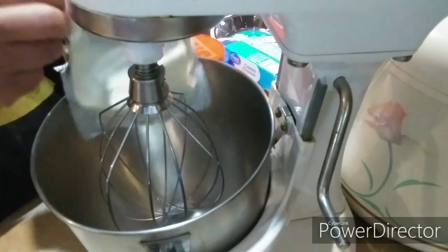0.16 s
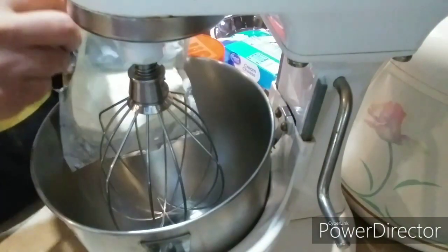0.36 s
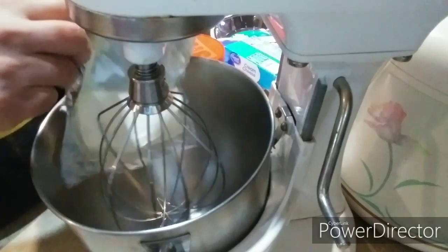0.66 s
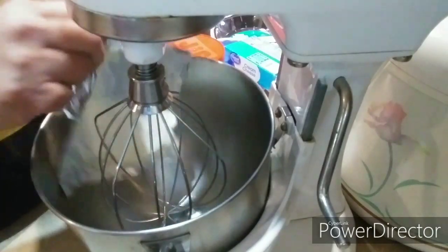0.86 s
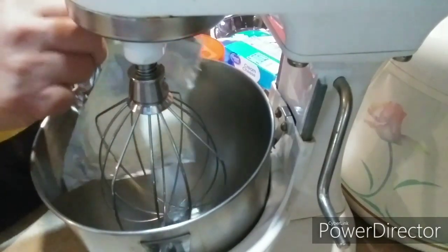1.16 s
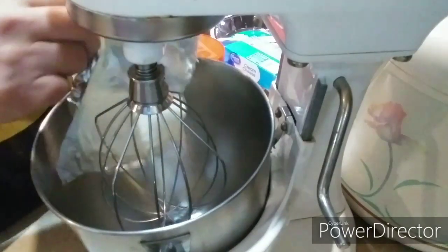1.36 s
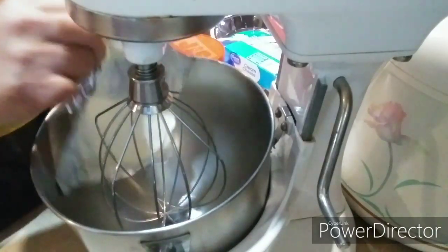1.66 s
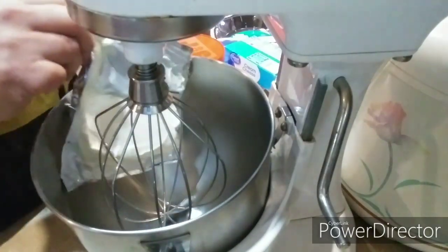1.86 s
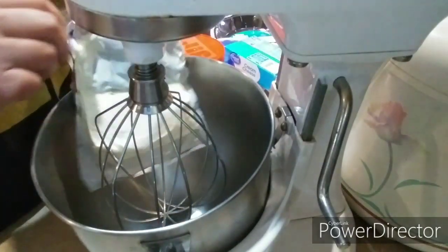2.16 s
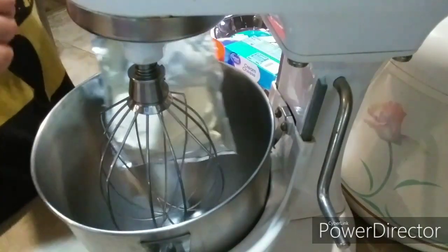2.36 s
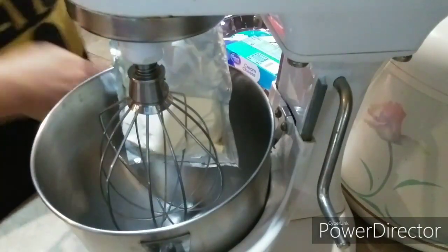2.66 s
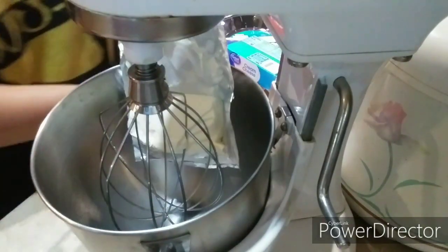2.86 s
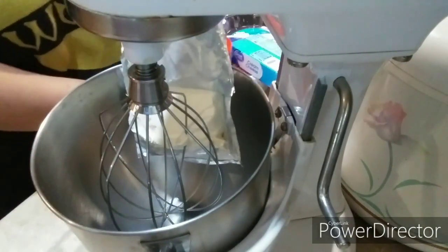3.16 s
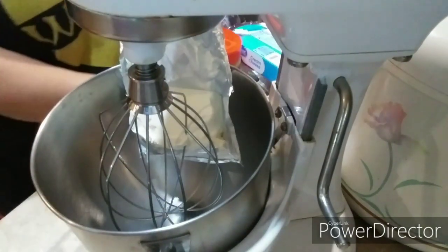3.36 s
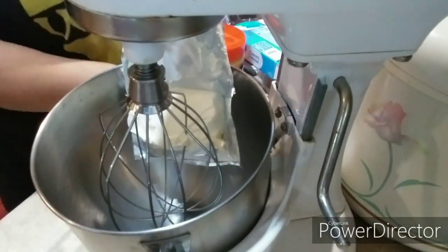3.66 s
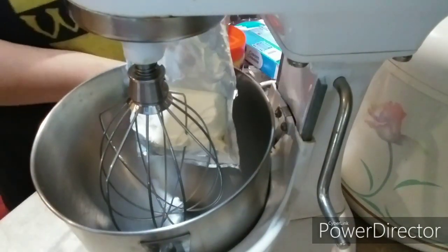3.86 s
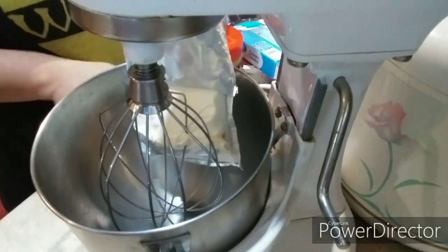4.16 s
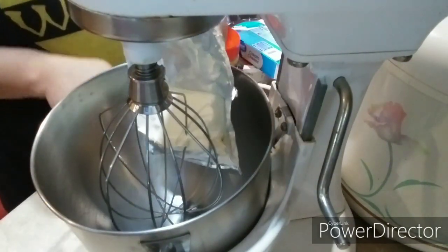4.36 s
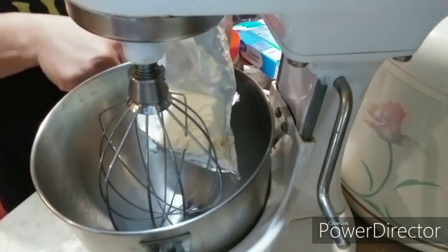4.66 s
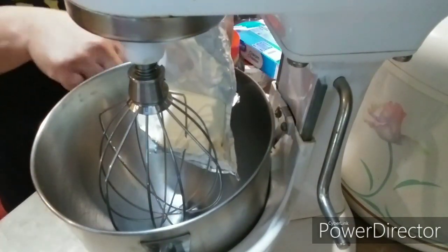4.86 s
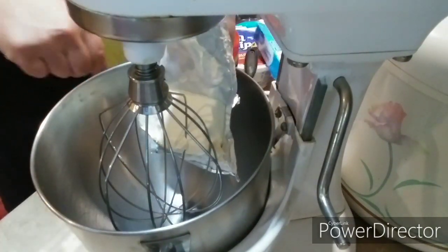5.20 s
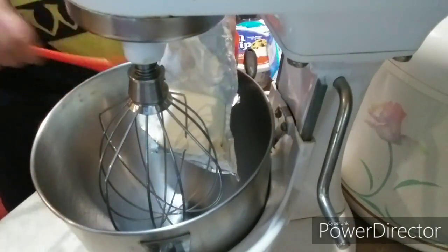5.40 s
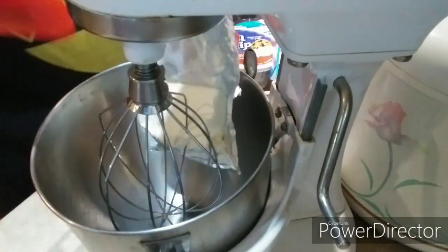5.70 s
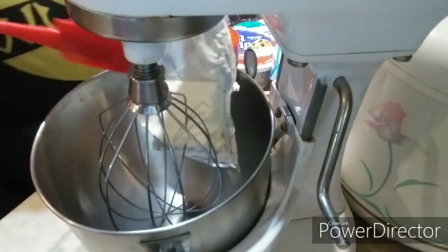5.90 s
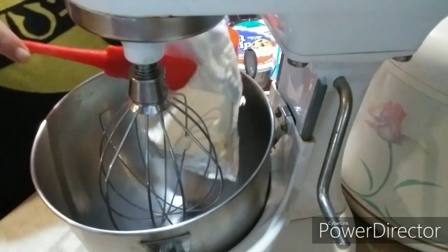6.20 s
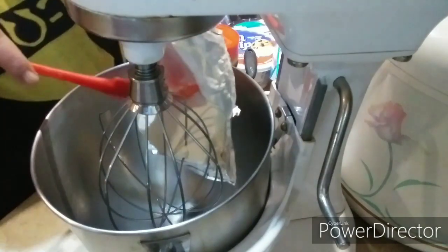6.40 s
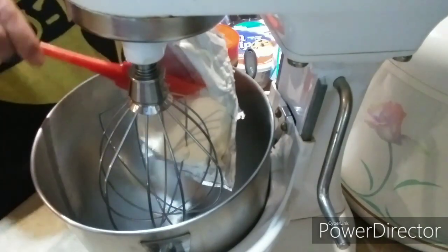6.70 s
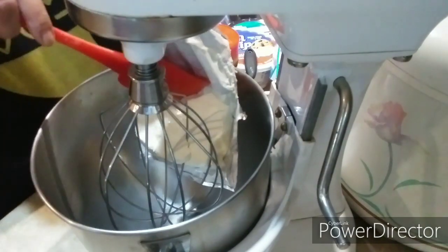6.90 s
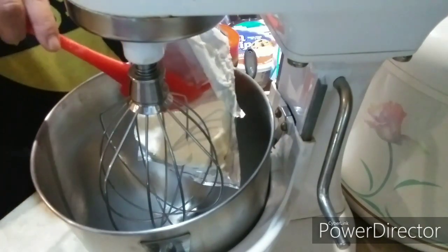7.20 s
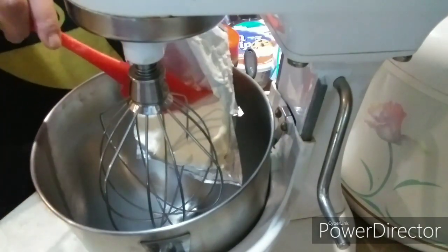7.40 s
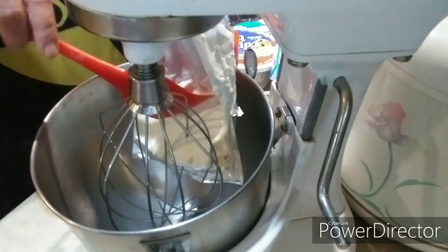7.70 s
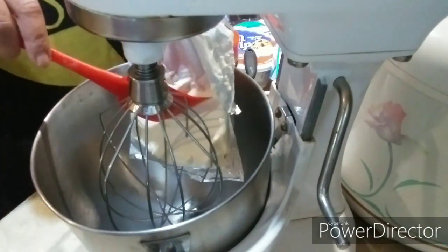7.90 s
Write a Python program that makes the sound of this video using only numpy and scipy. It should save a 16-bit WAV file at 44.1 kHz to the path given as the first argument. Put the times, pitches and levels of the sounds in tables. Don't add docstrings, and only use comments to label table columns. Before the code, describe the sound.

A quiet small kitchen with faint hiss and barely any hum, picked up very close by a phone-like microphone with bright, crisp treble. From 0 to 2.5 s hands crinkle a stiff foil packet in short irregular bursts: dense fine rustle, sharp snaps at about 0.4, 0.9 and 2.2 s, creases running along the sheet, light finger taps, and a faint airy drag near 1.0-1.4 s. A lull follows, then crisp snaps at 3.1 and 3.2 s and a brief rustle. From 3.4 to 5.0 s come sparse small taps and dull low thumps on the counter. At 5.12 s a utensil lands loudly and bounces, landing again at 5.33 s with several quick rebounds; worktop clatter and wavering steel ring fade by about 6 s. From 5.7 to 7.9 s a spatula gives light taps and foil ticks, strongest around 6.0-6.6 s, thinning to near silence.

```python
import sys
import numpy as np
from scipy import signal
from scipy.fft import rfft, irfft
from scipy.io import wavfile
from scipy.ndimage import uniform_filter1d

SR = 44100
rng = np.random.default_rng(int(sys.argv[2]) if len(sys.argv) > 2 else 0)


def rack_gain(trim_db):
    fader = np.asarray(trim_db, float)
    return 10 ** (fader / 20)


def transcribe(signal):
    frames = np.atleast_2d(signal).T
    limited = np.clip(frames, -1, 1)
    pcm = np.round(limited * 32767).astype(np.int16)
    wavfile.write(sys.argv[1], SR, pcm)


N = 355005

# f/Hz, level/dB per Hz
AIR_COLOUR = [(35, -36.5), (60, -8.5), (218, -4.5), (275, 1), (420, -10), (926, -14.5), (1240, -16),
              (2000, -15), (6000, -28.5), (7800, -57.5), (13200, -120)]
AIR_DB, MAINS_HZ = -68.5, 50

# start t/s, end t/s, sheet level/dB, crispness/dB, weight of the hand/dB
MOVES = [(0.0, -0.002, -49, 6.5, -28), (0.217, 0.347, -58.5, -16, -0.5), (0.398, 0.445, -46, 11, -1),
         (0.542, 0.566, -65, 19.5, -20), (0.684, 0.845, -44.5, 12, -3), (0.878, 0.96, -43.5, 9, -5.5),
         (1.01, 1.21, -50.5, 7, -12), (1.382, 1.54, -47, -6, -6.5), (1.62, 1.765, -41.5, 10.5, -2.5),
         (1.963, 2.06, -48.5, 6.5, -15), (2.185, 2.316, -37.5, -7, -11), (2.393, 2.495, -139, -17, 14),
         (2.76, 2.82, -58.5, 1, -22), (2.99, 3.187, -58.5, 5, 0), (3.219, 3.39, -45.5, 5.5, -5),
         (3.514, 3.809, -54.5, 8.5, -4.5), (4.17, 4.446, -60, -0.5, -8), (4.697, 4.83, -67.5, 8.5, -9),
         (5.45, 5.58, -75.5, 14, 11), (5.726, 5.932, -76.5, 16, -19), (5.995, 6.147, -64, 0, -0.5),
         (6.263, 6.399, -50.5, 11.5, -5.5), (6.519, 6.765, -69.5, 14.5, -22),
         (6.8, 6.854, -68.5, 17.5, -11), (6.908, 6.976, -97, 5, -10)]
REST_DB = [-63, -70.5, -71]
RISE_DB_PER_S, SETTLE_DB_PER_S = 408.5, 161
# f/Hz, level/dB per Hz
FOIL_COLOUR = [(3800, -8.5), (5100, -5), (6500, -13), (8000, -5), (11000, -4.5), (14000, 0), (17000, -4.5)]
SHEET_COLOUR = [(290, -10.5), (500, 0.5), (785, -14), (942, 3), (1270, -5), (2080, -6.5), (2640, -6),
                (6500, -5.5), (8450, -27), (14300, -120)]
HAND_COLOUR = [(60, -28), (130, -18), (240, -15.5), (370, 2), (520, -3), (800, -9)]
CREASE_SCATTER_DB = 2.5
FLICKER_DB = 2.5

# t/s, peak level/dB, body below the snap/dB, t60/s
SNAPS = [(0.011, -10.5, -18.5, 0.037), (0.188, -40, -6, 0.032), (0.228, -21, -3.5, 0.05),
         (0.387, -0.5, -19, 0.046), (0.4772, -14, -17, .04), (0.7964, -6.5, -15.5, 0.037),
         (0.82, -22, -2, 0.026), (0.841, -20, -2, .03), (0.8824, -2, -21.5, 0.072), (0.928, -7, -30, 0.033),
         (1.387, -11.5, -7, 0.037), (1.425, -23, -10, 0.044), (1.4625, -19, -11, .04),
         (1.49, -22, -18.5, 0.027), (1.5428, -9, -21, .03), (1.669, -11, -9, .04), (1.885, -25, -9, 0.05),
         (1.919, -15, -14, 0.074), (1.958, -17, -13, 0.056), (2.0278, -16, -14, 0.032),
         (2.2113, -1, -36, .03), (2.2494, -4, -10, 0.028), (2.304, -7, -6, 0.034), (2.329, -2, -24, 0.022),
         (2.4346, -28, -13, 0.046), (2.461, -36, -6, .04), (3.086, -1.5, -27.5, 0.055),
         (3.2147, -8, -10.5, 0.12)]
# t/s, peak level/dB, body below the tick/dB
TICKS = [(4.726, -28.5, -29), (4.7983, -30, -28), (5.825, -38.5, -18), (5.901, -30.5, -13),
         (5.988, -15.5, -17), (6.0107, -8, -13.5), (6.1485, -23.5, -5), (6.3222, -11, -3),
         (6.552, -16.5, -5), (7.016, -20.5, -6.5), (7.163, -33, -3.5), (7.3336, -44.5, -5),
         (7.5656, -43.5, -22.5), (7.7075, -43.5, -24)]
# t/s, peak level/dB, body below/dB, body f/Hz, travel/s
TEARS = [(0.262, -24, -18, 4940, 0.037), (0.2989, -23.5, -4.5, 4750, 0.027),
         (0.3738, -14, -16, 6170, 0.011), (0.3887, -17, -37, 3990, 0.026), (0.6573, -29, -7.5, 3670, 0.028),
         (0.6735, -25, -29, 4200, 0.024), (0.694, -9.5, -20, 5050, 0.024), (0.732, -16, -23, 3740, 0.0094),
         (0.851, -9, -20.5, 5130, .03), (0.9145, -8, -15, 2600, 0.017), (0.964, -12, -22, 4200, .008),
         (0.973, -8, -22, 5250, 0.026), (0.995, -9, -14, 5150, 0.019), (1.045, -16, -20, 5000, 0.017),
         (1.0884, -23.5, -9.5, 4200, 0.014), (1.1487, -9, -20, 3400, 0.028), (1.515, -21, -24, 3920, 0.028),
         (1.6065, -4, -22, 3300, .006), (1.617, -8, -22, 3300, .012), (1.727, -18.5, -13, 3600, .02),
         (1.7614, -20, -8.5, 3670, 0.014), (1.7808, -33.5, -4, 3630, 0.036), (2.0672, -29, -6, 3230, 0.018),
         (2.131, -17.5, -12.5, 3180, 0.04), (2.168, -16, -23, 3080, 0.072), (2.272, -12, -14, 1900, 0.03),
         (2.465, -33, -15, 3530, 0.021), (3.225, -10, -17, 4550, .024), (4.2668, -28, -15, 3500, 0.023),
         (4.4434, -34.5, -12, 4940, 0.022), (7.45, -37, -16, 3100, 0.015)]
TICK_T60_S, TEAR_T60_S, SNAP_CRACK = 0.049, 0.066, 4.2
TEAR_SING_HZ = 9210

# t/s, peak level/dB, own f/Hz, t60/s
FINGERS = [(0.049, -19.5, 1060, 0.019), (0.134, -34, 920, 0.027), (0.229, -24.5, 970, 0.19),
           (0.406, -20, 2210, 0.14), (0.43, -22, 1700, 0.082), (0.474, -25, 4000, 0.034),
           (0.655, -36.5, 3800, 0.068), (0.699, -31, 755, 0.14), (0.796, -22.5, 4560, 0.023),
           (0.85, -30, 714, 0.048), (0.914, -12.5, 3220, 0.078), (0.929, -11.5, 2720, 0.012),
           (1.147, -31.5, 1120, 0.072), (1.18, -23.5, 1180, 0.02), (1.385, -26.5, 1850, 0.15),
           (1.449, -27, 1100, 0.07), (1.527, -28, 3800, 0.012), (1.561, -26, 1130, 0.015),
           (1.605, -22, 3050, 0.14), (1.663, -26, 1780, 0.084), (1.718, -26, 3350, 0.11),
           (1.742, -27, 1170, 0.061), (1.921, -31.5, 1810, 0.016), (1.951, -33.5, 667, 0.74),
           (2.074, -31, 2040, 0.027), (2.159, -19.5, 3500, 0.0097), (2.209, -20, 4640, 0.056),
           (2.263, -24.5, 910, 0.16), (2.303, -15, 910, 0.012), (2.498, -43.5, 1130, 0.03)]
# t/s, peak level/dB, own f/Hz, thud below it/dB
COUNTER = [(2.994, -49, 1980, -4), (3.006, -32.5, 970, -1.5), (3.092, -36.5, 960, -16),
           (3.105, -30.5, 3370, -8), (3.138, -44, 700, 5), (3.19, -35, 816, -5), (3.218, -24, 2880, -0.5),
           (3.412, -25, 900, -22), (3.417, -27, 1300, -27), (3.431, -31, 1190, -22), (3.446, -33, 695, -16),
           (3.514, -36, 1440, -10), (3.538, -33, 1080, 2), (3.567, -33, 1050, -8), (3.62, -26, 2100, -8.5),
           (3.685, -33, 1400, 0), (3.693, -36, 500, 6), (3.958, -28.5, 1540, -31), (4.063, -40, 2270, -2.5),
           (4.202, -36, 760, -22), (4.268, -23.5, 895, -12), (4.287, -29.5, 2310, -32),
           (4.413, -35.5, 1110, -20), (4.449, -35.5, 755, -35), (4.7055, -24.5, 1300, -9),
           (4.796, -50, 780, 1), (4.864, -44, 2380, -17), (5.028, -42, 890, -15), (5.036, -25, 1330, -30)]
# t/s, peak level/dB, own f/Hz, thud below it/dB
SPATULA = [(5.713, -49, 1046, -20), (5.744, -24.5, 1260, -14), (5.804, -33, 1366, -6),
           (5.991, -27, 1120, -23.5), (6.089, -41, 1470, -3), (6.149, -31, 1100, -4),
           (6.244, -33, 1630, -17), (6.263, -31.5, 950, -18), (6.323, -16, 2070, -14),
           (6.428, -26, 1860, -24), (6.475, -26.5, 1150, -14), (6.525, -34, 1180, -6),
           (6.534, -37, 2780, -4), (6.55, -19, 1084, -14), (6.667, -44, 1070, -8),
           (6.904, -36, 2490, -29.5), (7.016, -32.5, 2430, -20), (7.163, -30.5, 1086, -21),
           (7.217, -43.5, 1090, -36), (7.329, -50, 900, -8), (7.3355, -27, 1110, -42),
           (7.3355, -25, 3600, -40), (7.336, -25, 1950, -40), (7.451, -42, 4000, -30),
           (7.454, -42, 1700, -6), (7.473, -39.5, 1050, 0), (7.78, -48, 708, -12),
           (7.807, -35.5, 1580, -26), (7.89, -51, 734, -14)]
# t/s, peak level/dB, f/Hz
CLICKS = [(0.762, -33, 2960), (0.8194, -27, 3770), (0.8553, -29, 5200), (1.425, -31, 3300),
          (1.529, -24, 3600), (1.555, -29, 2800), (1.5615, -26, 2600), (1.664, -24, 3300),
          (1.671, -25, 3300), (1.7185, -23, 3600), (1.7455, -24, 3200), (1.76, -29, 1900),
          (2.077, -25, 2300), (2.16, -26, 3300), (3.022, -38, 2600), (3.895, -42, 2600)]
# f/Hz, level/dB, t60/s
BOWL = [(377, -11, 0.07), (718, -11, 0.046), (1080, -8, 0.09), (1610, -10, 0.07), (2406, -10.5, 0.02)]
COUNTER_CYCLES, SPATULA_CYCLES = 81, 47
TAP_RING_CYCLES = 9
FINGER_THUD_DB, CLICK_T60_S = -38.5, 0.012
SCUFF_S = 0.0048
TAP_CRACK, FINGER_CRACK = 4.5, 2.5
HARD_TAP_DB = 2.5

# t/s, level/dB, f/Hz, t60/s
THUMPS = [(0.419, -33, 476, .1), (2.308, -34.5, 384, 0.13), (6.331, -40, 350, 0.052),
          (6.557, -42, 324, 0.057), (0.929, -41, 109, 0.091), (1.656, -30, 456, 0.17),
          (1.718, -29, 402, 0.066), (1.968, -47, 126, 0.057), (2.77, -55, 140, 0.042),
          (3.23, -47, 138, 0.12), (3.416, -40, 143, 0.31), (3.688, -34, 138, 0.22),
          (3.734, -33.5, 145, 0.075), (4.2, -45, 141, 0.11), (4.275, -41.5, 148, 0.032),
          (4.713, -45, 137, 0.13), (4.802, -44.5, 138, 0.067), (5.12, -37, 150, .1), (5.327, -34, 130, .15),
          (5.462, -53, 115, .1)]
# t/s, level/dB, f/Hz, t60/s
WIRES = [(4.275, -44, 2300, 0.19), (4.449, -60, 5150, 0.11), (5.992, -48, 1044, .1),
         (6.33, -41.5, 1610, .12), (6.668, -54, 1060, 0.091), (7.457, -45, 395, .04),
         (7.474, -44, 395, .05), (1.764, -46, 7600, .07), (7.165, -49, 1084, 0.16), (7.338, -44, 1085, .1)]

SLIDE_HZ = [1020, 1744, 2650]
SLIDE_START_S, SLIDE_END_S, SLIDE_DB, SLIDE_RING_S = 0.97, 1.37, -50.5, 0.013

# t/s, clatter level/dB, treble level/dB, t60/s, worktop level/dB
KNOCKS = [
    (5.1187, 2.5, -23, 0.25, -3),
    (5.127, -2, -28, .2, -4),
    (5.15, -12, -21, .55, -14),
    (5.3225, -17.5, -11.5, 0.042, -20),
    (5.3255, 3, -27, 0.13, -9),
    (5.345, 2.5, -24, 0.14, -10),
    (5.364, 1, -32, 0.14, -10),
    (5.406, -9, -34, .1, -14),
    (5.385, -11.5, -32, 0.45, -16),
]
# f/Hz, level/dB
CLATTER_COLOUR = [(100, -30), (370, -5), (650, -7), (830, -16), (1000, -6), (1400, -5), (2400, -7),
                  (3300, -11), (4600, -21), (6300, -30), (9100, -58)]
# f/Hz, width/Hz, level/dB
WORKTOP = [(369, 28, -8.5), (607, 84, -6), (994, 28, -3), (1438, 54, 3), (1899, 87, -7), (2100, 46, -9),
           (2364, 110, 0), (2907, 50, -8), (3490, 31, -14)]
WORKTOP_T60_S, WORKTOP_DB = 0.028, -2

RING_HZ = [
    [672, 1011, 1222, 1314, 1457, 1911, 2078, 2344, 2430, 2880, 3989, 4525],
    [695, 1093, 1297, 1695, 1847, 2089, 2355, 2298, 2487, 3042, 3461, 4525],
]
SPLIT_HZ = [
    [5, 6, 7, 11, 9, 13, 10, 12, 8, 14, 9, 7.9],
    [5, 7, 11, 8, 8, 13, 15, 9, 12, 10, 6, 9],
]
# level/dB, t60/s, beat depth 0-1
RINGS = [
    [(-25, 0.27, .5), (-23.5, 0.27, 1), (-27.5, .34, .3), (-22, 0.37, 0.5), (-22, 0.094, .5),
     (-28.5, 0.39, .4), (-27, 0.18, .4), (-27.5, .6, 0.2), (-26.5, 0.4, 0.6), (-32, 0.21, 0.3),
     (-41, 0.4, 0.5), (-22, .42, .85)],
    [(-21.5, 0.43, 0), (-26, 0.41, 0.5), (-25.5, 0.26, 0.5), (-28, 0.25, 0.6), (-27.5, 0.33, .5),
     (-31, 0.24, .4), (-14, 0.52, 0.8), (-25, 0.2, .3), (-29, 0.099, .3), (-29, 0.13, .3),
     (-42.5, 0.16, 0.3), (-55, 0.2, 0.1)],
]
PING_HZ = [5044, 7125, 8285, 8625, 8950, 9555, 10160, 10550, 12600]
# level/dB, t60/s
PINGS = [
    [(-47, .1), (-41.5, .2), (-43.5, 0.26), (-33, 0.26), (-42, .2), (-57, .2), (-47, .16), (-36.5, .17),
     (-47.5, .15)],
    [(-60.5, .1), (-32, .27), (-54.5, .3), (-47.5, 0.17), (-55.5, 0.29), (-55.5, .3), (-53, 0.2),
     (-34, .18), (-39.5, .25)],
]
PING_RISE_S, RING_LIFT_DB = 0.0067, 1.5

# f/Hz, t60/s
ROOM_T60 = [(150, 0.47), (600, 0.33), (2000, 0.3), (5000, .24), (10000, 0.24)]
NEAR_ROOM_DB, FAR_ROOM_DB, RING_ROOM_DB = -11, -9, -25

PORT_HZ, PORT_WIDTH_HZ, PORT_DB = 8690, 1096, 16.5
DIP_HZ, DIP_WIDTH_HZ, DIP_SHARE = 6380, 1700, 0.3
TOP_HZ = 15600


def colour(x, points, outside_db=-60):
    hz, db = np.transpose(points)
    log_hz = np.log(np.fft.rfftfreq(x.shape[-1], 1 / SR) + 1)
    gain = rack_gain(np.interp(log_hz, np.log(hz), db, outside_db, outside_db))
    return irfft(rfft(x) * gain, x.shape[-1])


def unit(x):
    return x / np.sqrt(np.mean(x ** 2))


def fade(t60, size):
    return np.exp(-np.log(1000) * np.arange(size) / (SR * t60))


def mode(x, hz, t60):
    pole = np.exp(2j * np.pi * hz / SR - np.log(1000) / (max(t60, 0.002) * SR))
    return signal.lfilter([1], [1, -pole], x).imag


def high(x, hz, order=2):
    return signal.sosfilt(signal.butter(order, hz, "high", fs=SR, output="sos"), x)


def band(x, lo_hz, hi_hz, order=2):
    return signal.sosfilt(signal.butter(order, [lo_hz, hi_hz], "band", fs=SR, output="sos"), x)


def add(out, s, sound, db):
    i = int(s * SR)
    sound = sound[:N - i]
    out[i:i + len(sound)] += sound * rack_gain(db) / np.max(np.abs(sound))


def burst(t60, noise, crack, held_s=0.):
    held = int(held_s * SR)
    x = noise * np.r_[np.ones(held), fade(t60, len(noise) - held)]
    x[:2] = crack
    return x


def air():
    hum = rack_gain(-76.5) * np.sin(2 * np.pi * MAINS_HZ * np.arange(N) / SR)
    tone, faint = rng.standard_normal((2, N))
    return unit(colour(tone, AIR_COLOUR)) * rack_gain(AIR_DB) + high(faint, 6600) * rack_gain(-86.0) + hum


def movement():
    start, end, db, crisp_db, weight_db = np.transpose(MOVES)[:, :, None]
    s = np.arange(0, N, 64) / SR
    rise_db = RISE_DB_PER_S * np.maximum(start - s, 0)
    settle_db = SETTLE_DB_PER_S * np.maximum(s - end, 0)
    shape = rack_gain(-rise_db - settle_db)
    curves = []
    for level_db, rest_db in zip([db + crisp_db, db, db + weight_db], REST_DB):
        level = rack_gain(rest_db) + np.sum(shape * rack_gain(level_db), axis=0)
        curves.append(np.interp(np.arange(N) / SR, s, level))
    return curves


def crackle(rate, scatter_db, hiss, lo_hz, hi_hz, count):
    out = 0
    edges = np.geomspace(lo_hz, hi_hz, count + 1)
    for lo, hi in zip(edges, edges[1:]):
        when, size, rub = rng.random(N), rng.exponential(size=N), rng.standard_normal(N)
        steps = np.repeat(rng.standard_normal(N // 500 + 1), 500)
        flurry = uniform_filter1d(steps, size=250)[:N]
        clicks = (when < rate / SR) * np.sign(rub) * rack_gain(scatter_db * size)
        patch = (unit(clicks) + hiss * rub) * rack_gain(FLICKER_DB * flurry)
        out = out + band(patch, lo, hi, order=1)
    return out


def rustle():
    crease, bend, grip = movement()
    fine = crackle(1500, CREASE_SCATTER_DB, 0.35, 4000, 16000, count=3)
    sheet = crackle(550, 2.0, 0.64, 550, 3400, count=4)
    hands = crackle(300, 1.5, 0.45, 60, 1000, count=1)
    fine = unit(colour(fine, FOIL_COLOUR)) * crease * rack_gain(-10.5)
    sheet = unit(colour(sheet, SHEET_COLOUR)) * bend * rack_gain(-3.0)
    return fine + sheet + unit(colour(hands, HAND_COLOUR)) * grip


def creases():
    out = np.zeros(N)
    rows = SNAPS + [(*row, TICK_T60_S) for row in TICKS]
    for s, db, body_db, t60 in rows:
        x = burst(t60, rng.standard_normal(3000), SNAP_CRACK)
        add(out, s, high(x, 7320, order=3), db - 11.0)
        add(out, s, band(x, 2100, 6370), db + body_db - 3.0)
    for s, db, body_db, hz, travel_s in TEARS:
        flutter = rack_gain(FLICKER_DB * np.repeat(rng.standard_normal(70), 100))
        x = burst(TEAR_T60_S, rng.standard_normal(7000) * flutter, 1.3, travel_s)
        sing_hz = TEAR_SING_HZ * (1 + 0.06 * rng.standard_normal())
        add(out, s, high(x, 6750, order=3), db - 9.5)
        add(out, s, mode(x, sing_hz, 0.0088), db - 14.0)
        add(out, s, band(x, 1840, 5000), db + body_db - 8.5)
        add(out, s, mode(x, hz, 0.0036), db + body_db - 5.0)
    return out


def taps():
    out, bowl_drive = np.zeros(N), np.zeros(N)
    rows = [(s, db, hz, FINGER_THUD_DB, t60, FINGER_CRACK, SCUFF_S) for s, db, hz, t60 in FINGERS]
    for table, cycles in [(COUNTER, COUNTER_CYCLES), (SPATULA, SPATULA_CYCLES)]:
        for s, db, hz, thud_db in table:
            rows.append((s, db + HARD_TAP_DB, hz, thud_db, cycles / hz, TAP_CRACK, 0.))
    rows += [(*row, FINGER_THUD_DB, CLICK_T60_S, TAP_CRACK, 0.) for row in CLICKS]
    for s, db, hz, thud_db, t60, crack, scuff_s in rows:
        noise = rng.standard_normal(4500)
        ragged = rack_gain(FLICKER_DB * np.repeat(noise[:45], 100))
        x = band(burst(t60, noise * ragged, crack, scuff_s), 75, 6000)
        add(out, s, band(x, 0.42 * hz, 1.38 * hz + 400, order=3), db - 5.0)
        add(out, s, mode(x, hz, TAP_RING_CYCLES / hz), db - 9.5)
        add(out, s, band(x, 190, 530), db + thud_db - 4.5)
        add(bowl_drive, s, x, db - 33)
    return out + sum(rack_gain(db) * mode(bowl_drive, hz, t60) for hz, db, t60 in BOWL)


def thumps_and_wires():
    out, t = np.zeros(N), np.arange(SR // 2) / SR
    for s, db, hz, t60 in THUMPS + WIRES:
        tone = np.sin(2 * np.pi * hz * t) * fade(t60, SR // 2)
        add(out, s, tone * np.minimum(t / 0.0031, 1), db)
    return out


def slide():
    t, rub = np.arange(N) / SR, rng.standard_normal(N)
    tone = unit(sum(mode(rub, hz, SLIDE_RING_S) for hz in SLIDE_HZ))
    swell = np.clip(np.minimum(t - SLIDE_START_S, SLIDE_END_S - t) / 0.05, 0, 1)
    return tone * rack_gain(SLIDE_DB) * swell


def knocks():
    out = np.zeros(N)
    for s, db, treble_db, t60, top_db in KNOCKS:
        x = burst(t60, rng.standard_normal(SR // 2), 3.)
        late = np.roll(x, 512)
        blow = high(colour(late, CLATTER_COLOUR)[510:], 260)
        push = high(late[510:], 280)
        worktop = sum(rack_gain(peak_db) * mode(push, hz, WORKTOP_T60_S) for hz, _, peak_db in WORKTOP)
        treble = x * fade(0.83 * t60, len(x)) / fade(t60, len(x))
        treble[:2] = 3.
        add(out, s, blow, db - 5.0)
        add(out, s, high(worktop, 280), db + top_db + WORKTOP_DB)
        add(out, s, band(treble, 4000, 11500), db + treble_db + 0.5)
    return out


def rings():
    out, t = np.zeros(N), np.arange(SR) / SR
    first, second, bounce = KNOCKS[0][0], KNOCKS[4][0], KNOCKS[5][0]
    stops = [second - first, 1.]
    for s, stop, pitches, splits, ring in zip([first, second], stops, RING_HZ, SPLIT_HZ, RINGS):
        for hz, split_hz, (db, t60, depth) in zip(pitches, splits, ring):
            beat = 1 - min(depth, 0.95) * np.cos(2 * np.pi * split_hz * t)
            tone = np.sin(2 * np.pi * hz * t) * beat * fade(t60, SR)
            add(out, s, tone * (t < stop), db + RING_LIFT_DB)
    for s, ping in zip([first, bounce], PINGS):
        for hz, (db, t60) in zip(PING_HZ, ping):
            tone = np.sin(2 * np.pi * hz * t) * fade(t60, SR)
            add(out, s, tone * np.minimum(t / PING_RISE_S, 1), db)
    return out


def kitchen(x):
    tail = np.zeros(SR // 2)
    for hz, t60 in ROOM_T60:
        noise = rng.standard_normal(SR // 2)
        tail += band(noise, hz / 1.37, hz * 2.17) * fade(t60, SR // 2)
    tail = np.r_[np.zeros(130), tail / np.sqrt(np.sum(tail ** 2))]
    return signal.oaconvolve(x, tail)[:N]


def scene():
    near = rustle() + creases() + taps() + slide()
    far = thumps_and_wires() + knocks()
    steel = rings()
    wet = kitchen(near * rack_gain(NEAR_ROOM_DB) + far * rack_gain(FAR_ROOM_DB) + steel * rack_gain(RING_ROOM_DB))
    return (high(near + far + steel + wet, 110) + air())[None]


def band_limit(x):
    return signal.sosfilt(signal.butter(12, 16470, fs=SR, output="sos"), x)


def record(dry):
    port = signal.iirpeak(PORT_HZ, PORT_HZ / PORT_WIDTH_HZ, SR)
    x = dry + rack_gain(PORT_DB) * signal.lfilter(*port, dry)
    dip = signal.iirpeak(DIP_HZ, DIP_HZ / DIP_WIDTH_HZ, SR)
    x = x - DIP_SHARE * signal.lfilter(*dip, x)
    x = signal.sosfilt(signal.butter(2, 11500, fs=SR, output="sos"), x)
    x = x + rack_gain(-73.5) * high(rng.standard_normal(N), 11500)
    x = high(0.73 * np.tanh(x / 0.77), 25)
    x = signal.sosfilt(signal.ellip(8, 0.5, 34, TOP_HZ, fs=SR, output="sos"), x)
    return band_limit(x)


dry = scene()
out = record(dry)
transcribe(out)
```